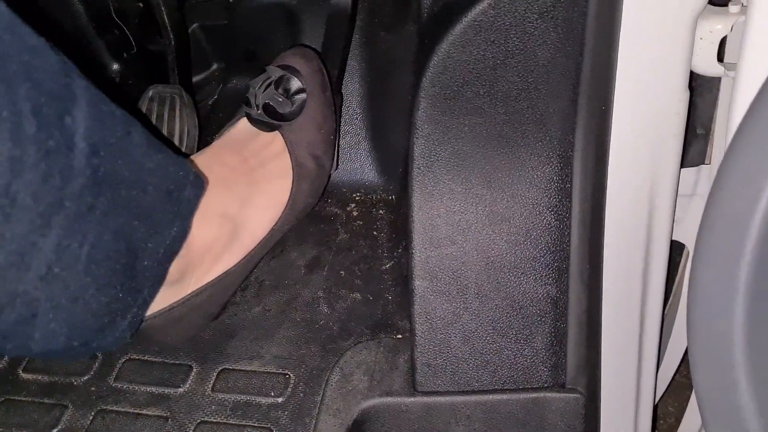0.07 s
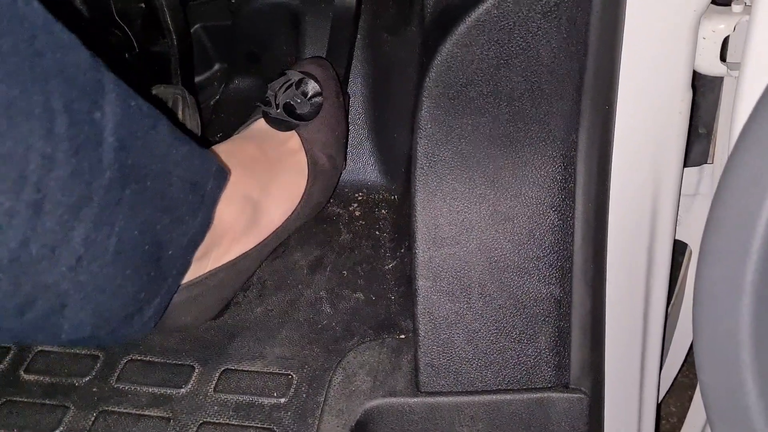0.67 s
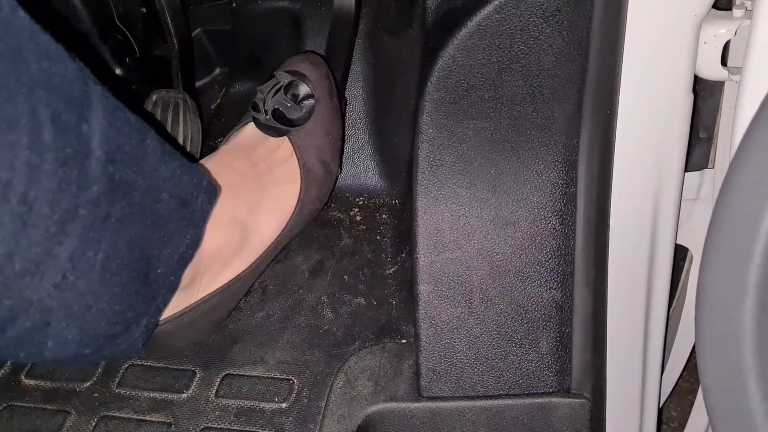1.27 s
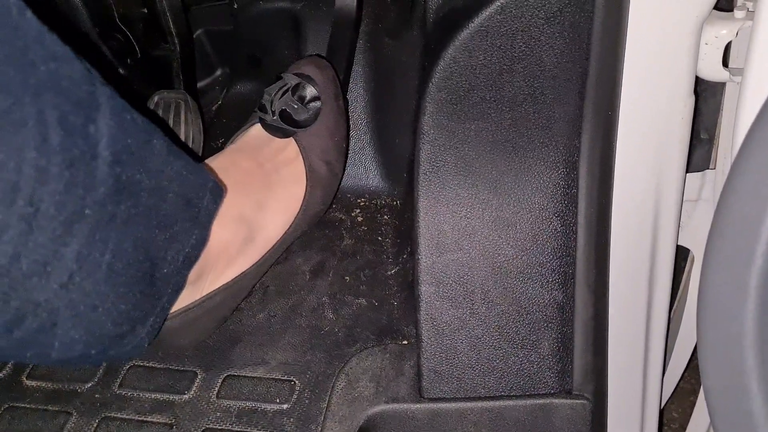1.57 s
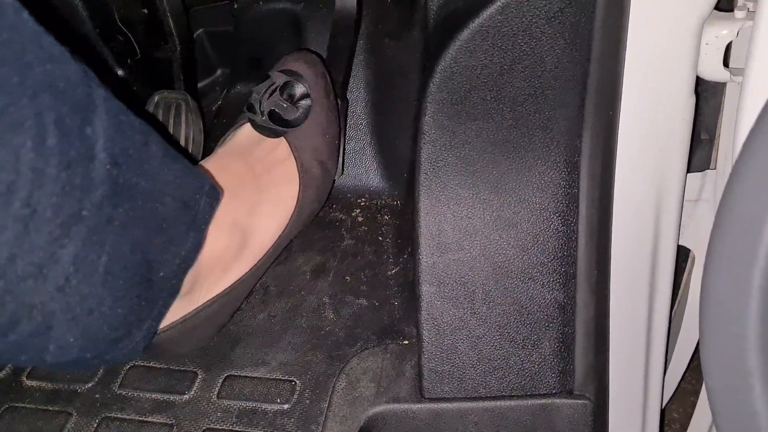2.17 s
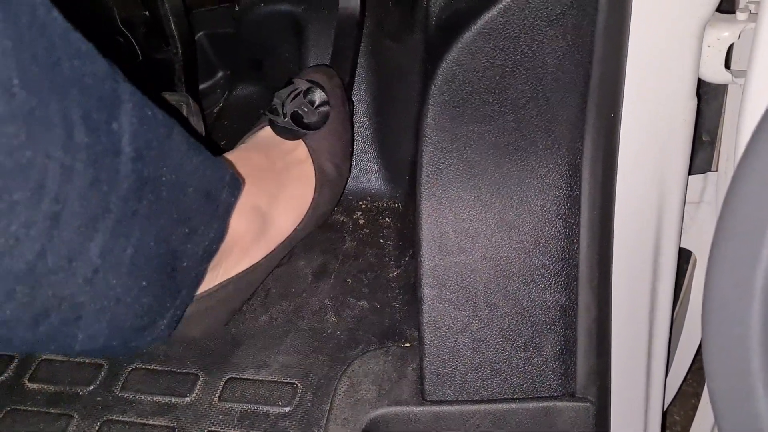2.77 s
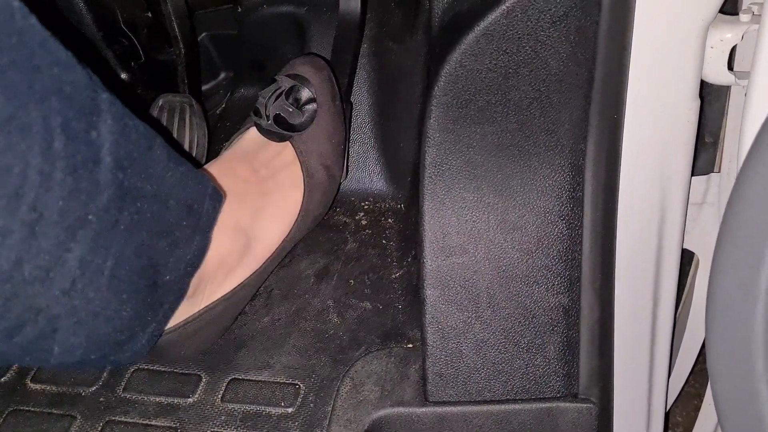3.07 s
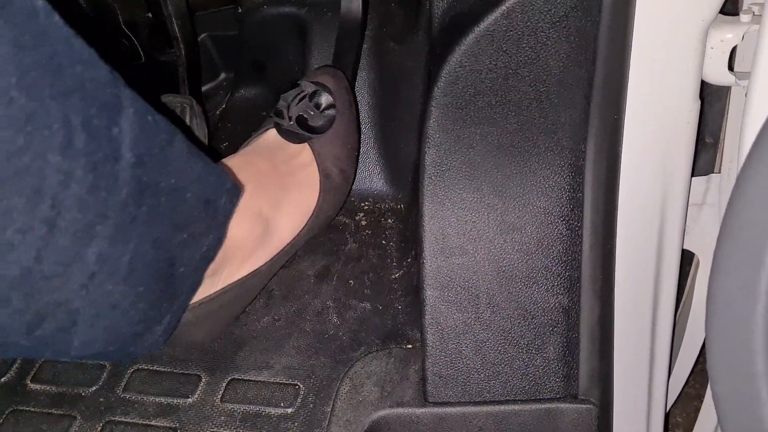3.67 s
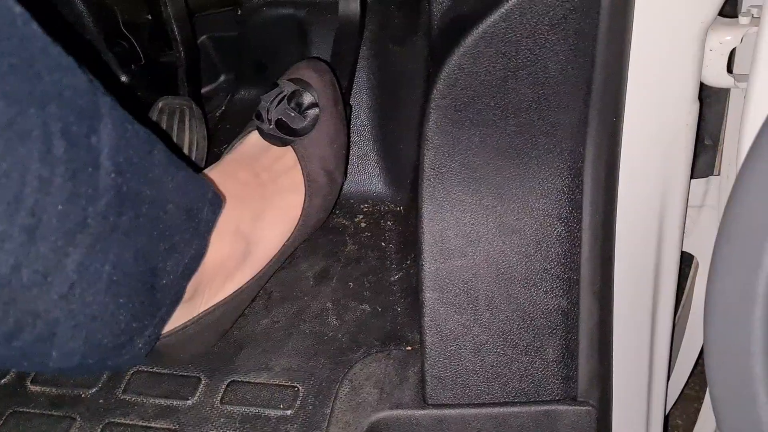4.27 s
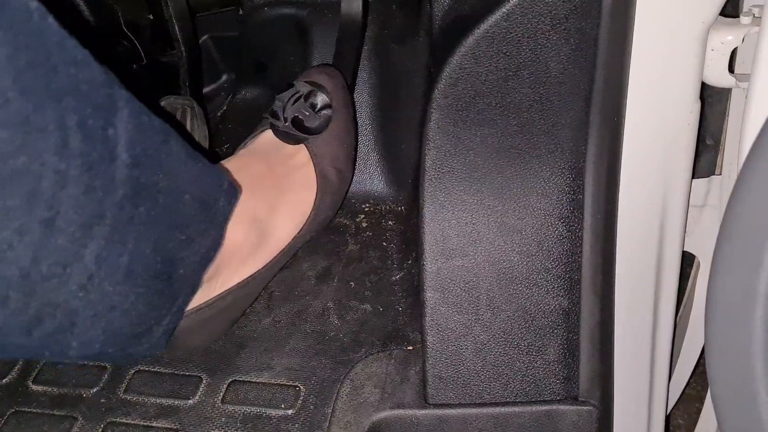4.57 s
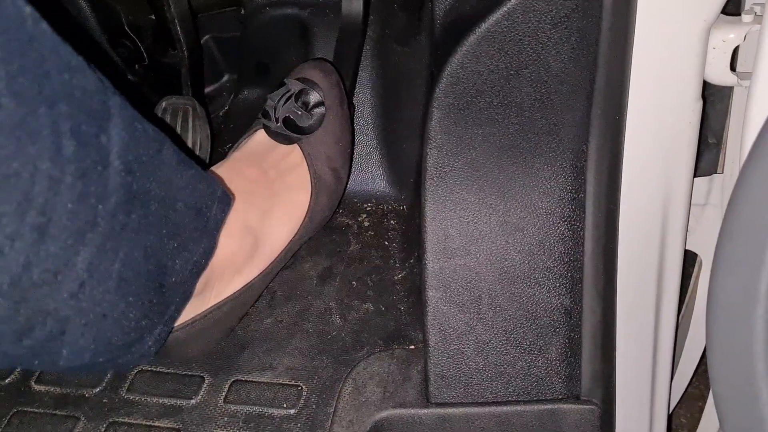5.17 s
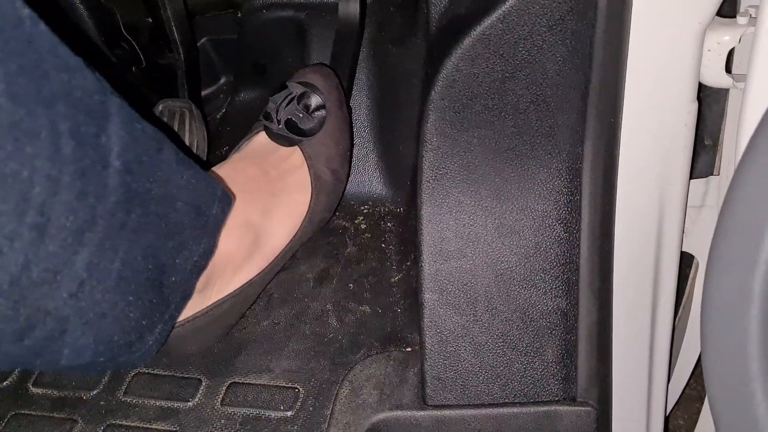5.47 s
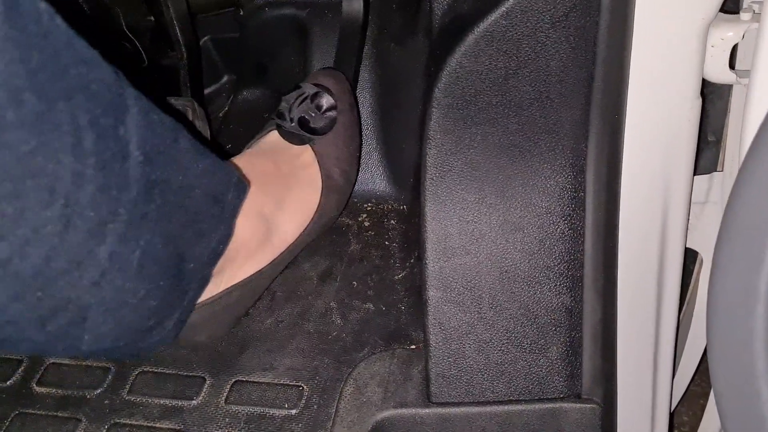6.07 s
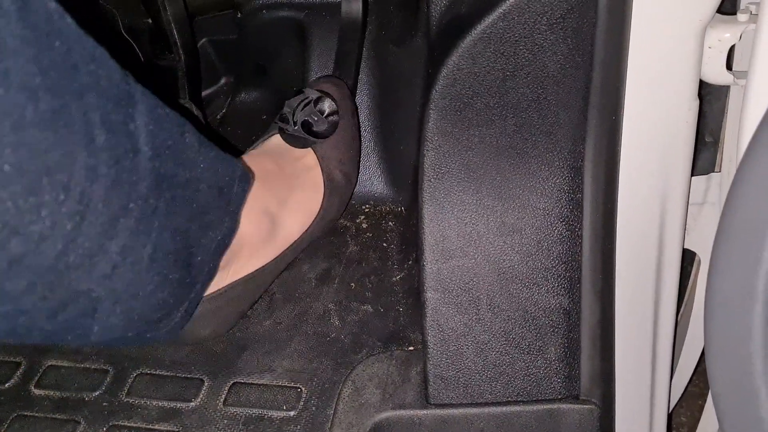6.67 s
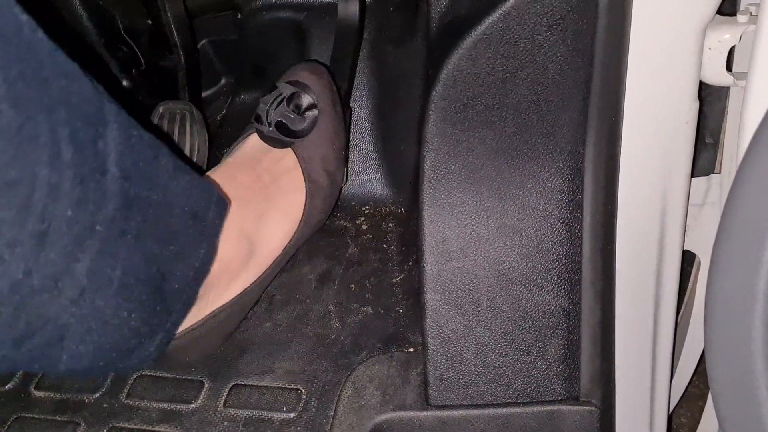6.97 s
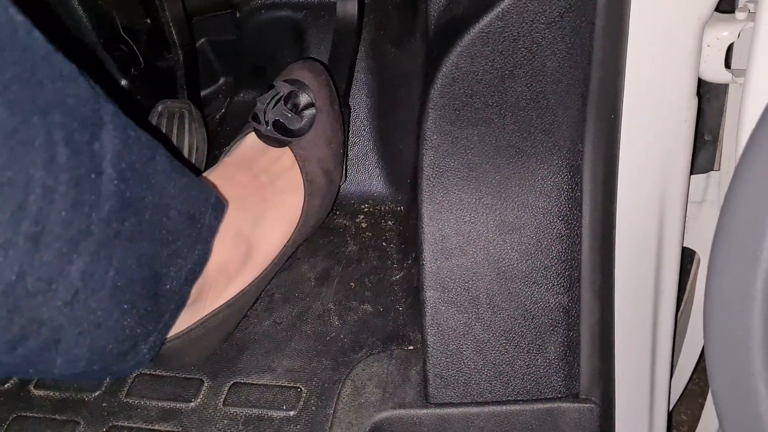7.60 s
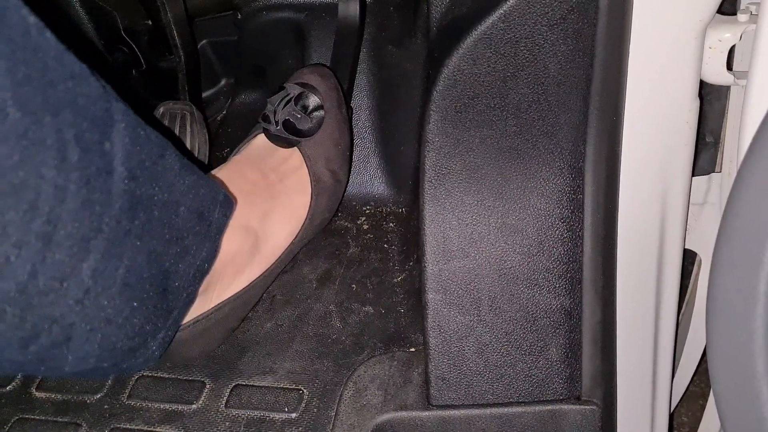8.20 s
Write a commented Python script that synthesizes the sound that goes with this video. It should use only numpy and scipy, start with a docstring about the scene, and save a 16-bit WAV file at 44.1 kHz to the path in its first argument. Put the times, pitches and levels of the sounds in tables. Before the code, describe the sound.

A car engine revs, heard from the driver's footwell: six short blips, then two higher ones, with deep boom, clatter and hiss.

```python
"""A car engine revs, heard from the driver's footwell: six short blips, then two more that climb higher.
Its four cylinders fire in turn, and the number of firings each second sets the pitch of a deep boom
in the cabin. The engine's knocks ring the panels between engine and cabin, which makes the clatter.
Each press of the pedal opens the throttle (the air valve): air gulps in and a pulsing hiss brightens.
Behind it all are a low rumble, a soft drone and thin whistles."""
import sys
import numpy as np
from scipy import signal
from scipy.fft import rfft, irfft, next_fast_len
from scipy.io import wavfile
from scipy.ndimage import uniform_filter1d

SR = 44100
rng = np.random.default_rng(int(sys.argv[2]) if len(sys.argv) > 2 else 0)


def dump(signal):
    """Clip the signal to [-1, 1] and save it as 16-bit WAV at the path in sys.argv[1]."""
    limited = np.clip(np.atleast_2d(signal).T, -1, 1)
    pcm = np.round(limited * 32767).astype(np.int16)
    wavfile.write(sys.argv[1], SR, pcm)


N = 372204
TIME, HZ = np.arange(N) / SR, np.fft.rfftfreq(next_fast_len(N, True), 1 / SR)
CRUISE_HZ = 60  # firing rate at which the levels of rumble, fizz and air are given
OPEN_S, CLOSE_S, CLOSE_LAG_S = 0.039, 0.051, 0.037  # throttle: opening, shutting, delay after a peak

# Pedal presses: pedal down t/s, engine peak t/s, top firing rate f/Hz, extra boom/dB, rushing air/dB,
# gulp strength/dB, lean towards the upper whistle/dB
PEDAL_PRESSES = [(0.689, 0.929, 72.25, 0.5, -43.5, -47, -2), (1.75, 1.932, 69.4, 1, -43, -30.5, 4),
                 (2.721, 2.91, 71.2, 0.5, -43.5, -50, 0), (3.715, 3.934, 67.5, -2, -42.5, -40, 4),
                 (4.66, 4.93, 70.86, -1.5, -42.5, -44, -4), (5.656, 5.877, 67.64, -2, -43.5, -46, -3),
                 (6.119, 6.306, 79.63, -2, -42.5, -54, -4), (6.55, 6.818, 97.12, -1.5, -42.5, -55, 2)]
DOWN_S, PEAK_S, TOP_HZ, BOOM_DB, AIR_DB, GULP_DB, LEAN_DB = np.transpose(PEDAL_PRESSES)
# Tone of the hiss: f/Hz, throttle shut left/dB, shut right/dB, open left/dB, open right/dB
HISS_TONE = [(1700, -6.5, -0.5, -6, 3), (2010, -8, -2, -10, -1.5), (2370, -15.5, -13, -4, -2),
             (2440, -12.5, -9, -5, -4.5), (2880, -14, -10, -11, -6.5), (3920, -19.5, -8.5, -12.5, 0.5),
             (4470, -21.5, -11, -16, -8), (5700, -20.5, -12.5, -19, -9.5), (6250, -19.5, -4.5, -11, -1.5),
             (6910, -17, -8, -19, -2.5), (7620, -36, -18.5, -22, -18), (8150, -21, -23.5, -18, -19),
             (8600, -18, -16, -14.5, -17), (9700, -29.5, -21.5, -26, -16.5),
             (11300, -28.5, -16.5, -29, -16.5), (15600, -35, -25, -34, -25)]
# Pitches of the gear and belt whines, as multiples of the firing rate
WHINE_MULTIPLES = [4, 6.5, 7, 8, 9, 10, 11, 12, 13, 15, 16, 18, 19, 20, 21, 22]


def amp(db):
    """Turns decibels into a gain."""
    return 10 ** (np.asarray(db) / 20)


def unit(x):
    """Scales the average level (rms) to 1; stereo goes by the mean of both sides."""
    return x / np.sqrt(np.mean(np.atleast_2d(x).mean(0) ** 2) + 1e-20)


def steadied(x, size=11000):
    """Holds the mean of both sides near level 1 over each quarter second."""
    return x / np.sqrt(uniform_filter1d(x.mean(0) ** 2, size) + 1e-20)


def at(rows, where):
    """Reads a table's columns along a moving frequency or time."""
    knots, *columns = np.transpose(rows)
    return np.array([np.interp(where, knots, c) for c in columns])


def spectra(rows):
    """Reads a table's columns at every frequency in HZ."""
    hz, *columns = np.transpose(rows)
    return np.array([np.interp(np.log(HZ + 1), np.log(hz + 1), c) for c in columns])


def colour(x, gain):
    """Filters x with one gain for each frequency."""
    size = next_fast_len(N, True)
    return irfft(rfft(x, size) * gain, size)[..., :N]


def bell(x, centre, width):
    """A smooth hump, 1 at its centre."""
    return np.exp(-((x - centre) / width) ** 2)


def drift(rate_hz):
    """A smooth random wander of level 1."""
    return unit(colour(rng.standard_normal(N), bell(HZ, 0, rate_hz)))


def strokes(firings, depth, sharpness):
    """A gain that swells once with every firing."""
    return unit(1 + depth * (.5 + .5 * np.cos(2 * np.pi * firings)) ** sharpness)


def pedal(close_s, lag_s=0):
    """How far each press opens the throttle, 0-1: it snaps open and eases shut as the engine peaks."""
    ramps = [np.minimum((TIME - down) / OPEN_S, (peak + lag_s - TIME) / close_s)
             for down, peak in zip(DOWN_S, PEAK_S)]
    return np.clip(np.array(ramps) + .5, 0, 1)


def throttle():
    """How open the throttle is over all presses, 0-1."""
    return pedal(CLOSE_S, CLOSE_LAG_S).sum(0)


def coasting(from_hz, age, friction_hz_per_s=12.8, drag_per_s=.273):
    """Friction and drag slow the engine once the pedal is up."""
    friction_hz = friction_hz_per_s / drag_per_s
    return (from_hz + friction_hz) * np.exp(-drag_per_s * age) - friction_hz


def firing_rate(start_hz=64.7, bend=1.17):
    """Firings per second, two for each engine turn: every press pulls the rate up, then it sinks."""
    rate = coasting(start_hz, TIME)
    for down, peak, top_hz in zip(DOWN_S, PEAK_S, TOP_HZ):
        from_hz = np.interp(down, TIME, rate)
        progress = np.clip((TIME - down) / (peak - down), 0, 1)
        climb = from_hz + (top_hz - from_hz) * progress ** bend
        rate = np.where(TIME < down, rate, np.where(TIME < peak, climb, coasting(top_hz, TIME - peak)))
    return rate


def rumble(rate, level_db=-38, db_per_octave=-3, apart=0.22):
    """The car's body shakes unevenly, most at low engine speed and almost alike at both ears."""
    # Tone of the shaking body: f/Hz, relative level/dB
    body_tone = [(10, -18), (24, -22), (36, 2.5), (60, 3), (85, -8), (110, -1), (135, -11), (220, -6),
                 (270, -21), (400, -12), (800, -64)]
    noise = rng.standard_normal(N) + apart * rng.standard_normal((2, N))
    shake = unit(colour(noise, amp(spectra(body_tone))))
    return amp(level_db + db_per_octave * np.log2(rate / CRUISE_HZ)) * shake * amp([[-.6], [.6]])


def drone(pitch_hz=110, waver=.25, flutter=.3):
    """A soft, wavering drone comes and goes in the cabin."""
    # Swells of the drone: t/s, level/dB
    swells = [(0, -58), (1.05, -41), (1.4, -35), (1.56, -50), (1.65, -29), (1.85, -30.5), (2.1, -52),
              (2.55, -39), (3.6, -52), (5.55, -44.5), (8.44, -50)]
    turns = pitch_hz * TIME + waver * drift(8)
    gain = amp(at(swells, TIME)[0]) * (1 + flutter * drift(10))
    return np.sqrt(2) * gain * np.cos(2 * np.pi * turns) * amp([[-.6], [.6]])


def whistles(shut_hz=6700, low_hz=4105, high_hz=7080, width_hz=36, shut_db=-57, low_db=-53, high_db=-56):
    """Air whistles thinly at the throttle: one tone when it is shut, two while it is open."""
    bands = (shut_hz, width_hz), (low_hz, 1.7 * width_hz), (high_hz, 2 * width_hz)
    shut, low, high = (unit(colour(rng.standard_normal((2, N)), bell(HZ, *band))) for band in bands)
    presses = pedal(CLOSE_S)
    rushing = (amp(low_db - LEAN_DB) @ presses) * low + (amp(high_db + LEAN_DB) @ presses) * high
    return (amp(shut_db) * shut * (1 - throttle()) + rushing) * amp([[-13], [0]])


def reflections():
    """Ringing metal and echoes off the footwell walls put close peaks and dips in the treble."""
    # Ringing engine parts: f/Hz, width/Hz, lift/dB
    metal_rings = [(2470, 40, 7.5), (2820, 35, 3), (3060, 40, 3.5), (3680, 33, 6), (5001, 64, 5)]
    knots_hz = np.arange(0, SR / 2, 40)
    ripples = rng.standard_normal((2, len(knots_hz)))
    ripple_db = 1.8 * np.array([np.interp(HZ, knots_hz, side) for side in ripples])
    ring_db = sum(db / (1 + (2 * (HZ - hz) / width) ** 2) for hz, width, db in metal_rings)
    return amp(ripple_db + ring_db)


def hiss(firings, rate, fizz_db=-46, leak_db=-60, low_cut_hz=1600, grain_db=0.4):
    """Valves fizz with each firing; air rushes through the open throttle and leaks past it at speed."""
    tone = amp(spectra(HISS_TONE)) / np.sqrt(1 + (low_cut_hz / (HZ + 1)) ** 20)
    fizz, air = rng.standard_normal((2, 2, N)) * amp(grain_db * drift(300))
    walls = reflections()
    valves = unit(colour(fizz * strokes(firings, depth=0.14, sharpness=5), walls * tone[:2]))
    rush = unit(colour(air * strokes(firings, depth=0.13, sharpness=2.5), walls * tone[2:]))
    octaves = np.log2(rate / CRUISE_HZ)  # all three parts grow louder as the engine speeds up
    flow = (amp(AIR_DB) @ pedal(CLOSE_S, CLOSE_LAG_S)) * amp(2 * octaves)
    leak = amp(leak_db + 32 * octaves)
    return amp(fizz_db + 14 * octaves) * valves + np.hypot(flow, leak) * rush


def gulps(body_db=11, body_hz=520, width_hz=90, top_hz=7000, rise_s=.002, decay_s=0.024, lead_s=0.0025):
    """Air bursts into the engine's empty intake pipes with a short, hollow chuff."""
    swell = np.zeros(N)
    for down, db in zip(DOWN_S, GULP_DB):
        age = np.maximum(TIME - down + lead_s, 0)
        swell += amp(db) * (1 - np.exp(-age / rise_s)) * np.exp(-age / decay_s)
    hollow = 1 + amp(body_db) * bell(HZ, body_hz, width_hz) + 1.8 * np.exp(-(HZ / 1900) ** 4)
    band = HZ ** 4 / (HZ ** 4 + 400 ** 4) / (1 + (HZ / top_hz) ** 4)
    open_tone = amp(spectra(HISS_TONE)[2:])
    return 2 * swell * unit(colour(rng.standard_normal((2, N)), open_tone * hollow * band))


def panel_ring(rate, ring_hz=782, width_hz=16, level_db=-36, centre_hz=68, reach_hz=4):
    """One panel sings out while the engine passes through the speeds that shake it most."""
    ring = unit(colour(rng.standard_normal(N), bell(HZ, ring_hz, width_hz)))
    return amp(level_db) * bell(rate, centre_hz, reach_hz) * ring * amp([[-4], [2]])


def whine(firings, waver=0.5, slip=0.059, throttle_dip=0.25):
    """Gears and belt sing along with the engine; slack between the parts blurs their tones."""
    # Strength of each whine next to the knocking: level/dB
    whine_levels = [-11, -18.5, -17, -13.5, -14.5, -13, -11.5, -10.5, -12.5, -15, -19, -14.5, -15, -18, -14,
                    -11.5]
    tones = np.zeros(N)
    for multiple, db in zip(WHINE_MULTIPLES, whine_levels):
        slack, flutter = drift(20), drift(14)
        turns = multiple * firings + rng.random() + slip * np.sqrt(multiple / 10) * slack
        tones += np.sqrt(2) * amp(db) * np.cos(2 * np.pi * turns) * (1 + waver * flutter)
    return tones * (1 - throttle_dip * throttle())  # they stand out most with the pedal up


def knock_cycle(firings, firing_db=5, turn_db=4, count=200, size=8192):
    """Knocks repeat every four firings; tones in step with each engine turn or firing are stronger."""
    multiple = np.arange(count) / 4
    db = firing_db * (multiple % 1 == 0) + turn_db * (multiple % .5 == 0)
    heard = (multiple > 3) & ~np.isin(multiple, WHINE_MULTIPLES)  # leaves room for boom and whines
    tones = amp(db) * np.exp(2j * np.pi * rng.random(count)) * heard
    place_in_cycle = firings / 4 % 1
    return unit(np.interp(place_in_cycle * size, np.arange(size), irfft(tones, size)))


def knocking(firings):
    """The knock pattern slowly changes, over a loose rattle that differs with each stroke."""
    blend = 0.63 * drift(0.71)
    first, second = knock_cycle(firings), knock_cycle(firings)
    loose = .66 * unit(colour(rng.standard_normal(N), HZ < 3000))
    impacts = strokes(4 * firings, depth=2.5, sharpness=2)
    knocks = np.cos(blend) * first + np.sin(blend) * second + loose * impacts
    return knocks * strokes(firings, depth=0.31, sharpness=0.67)


def clatter(firings, rate, lag_s=0.00011, steepness=1.57):
    """Knocks and whines ring the panels and reach the left side a moment after the right."""
    # Pitches at which panels and cabin ring: f/Hz, width/Hz, relative left/dB, relative right/dB
    panels = [(185, 85, -7, -5), (299, 23, -10.5, -10), (339.7, 14, -9.5, -4.5), (427, 42, -1.5, -1),
              (491.7, 31.5, 2.5, 3), (555, 36, -1, 1), (592, 68, 1.5, -26), (668, 52, -9.5, -11),
              (769.3, 45, -2, 3), (819, 63, 1.5, -4.5), (956, 84, -2, -6.5), (1006, 63, -10.5, 4),
              (1107, 55, 3, -1.5), (1201, 43, 1.5, 6), (1269, 64, 1.5, 5.5), (1372.5, 68, -0.5, 6.5),
              (1537, 130, -11.5, -7), (1880, 250, -44, -24)]
    # How alike the two sides are: f/Hz, likeness (0-1)
    likeness = [(200, 0.84), (340, 0.83), (500, 1), (780, 0.61), (1200, 0.61), (1500, 0.93), (1900, 0.21)]
    # Panel rattle at each engine speed: firing rate f/Hz, low band/dB, middle band/dB, high band/dB
    rattle = [(43.7, -39, -53, -41), (52.8, -42.5, -48.5, -39), (54.8, -41.5, -48, -35.5),
              (60.5, -38, -43, -37), (64.5, -38, -39.5, -33.5), (67.9, -35.5, -40.5, -32),
              (73, -36, -40.5, -33.5), (82.8, -31.5, -37, -32.5), (85, -33, -45, -31.5),
              (94.1, -29.5, -39, -31)]
    # Change in rattle with the throttle open: low band/dB, middle band/dB, high band/dB
    open_change = [2.5, -1, 0]
    direct, scattered = knocking(firings) + whine(firings), knocking(firings)
    same = np.clip(spectra(likeness)[0], -1, 1)
    delay = np.exp(-2j * np.pi * HZ * lag_s)
    left = colour(direct, same * delay) + colour(scattered, np.sqrt(1 - same ** 2))
    drive = np.array([left, direct])
    power = sum(amp([[left_db], [right_db]]) ** 2 / (1 + np.abs(2 * (HZ - hz) / width) ** (2 * steepness))
                for hz, width, left_db, right_db in panels)
    low, high = 1 / (1 + (HZ / 700) ** 30), 1 - 1 / (1 + (HZ / 900) ** 30)
    bands = low, np.maximum(1 - low - high, 0), high
    levels = at(rattle, rate) + np.outer(open_change, throttle())
    return sum(amp(db) * steadied(colour(drive, np.sqrt(power * band))) for db, band in zip(levels, bands))


def boom(firings, rate, lag_s=0.0003, unload_s=0.065, settle_s=0.0068):
    """The firings' three lowest tones swell as they slide through pitches at which the cabin rings."""
    # Cabin's answer at 1, 2 and 3 times the firing rate: f/Hz, pedal up level/dB, pedal down level/dB
    first = [(47, -36.5, -24), (46.3, -23, -38.5), (49.9, -31.5, -27.5), (53.7, -21.5, -18.5),
             (57, -24, -16), (61.1, -21.5, -20.5), (63.6, -28, -21.5), (65.4, -29.5, -23.5),
             (72, -26.5, -22.5), (77, -24.5, -20.5), (82.8, -26, -20), (87.4, -18.5, -15), (95, -27, -18.5),
             (95.5, -23, -19)]
    second = [(93, -41, -54), (100, -31, -25.5), (100.6, -37, -37.5), (115, -41, -35.5), (120, -58, -52),
              (128.3, -41, -39), (162, -38.5, -36), (173.6, -53, -37), (177, -35, -32.5)]
    third = [(146, -44, -43), (143, -45, -41), (158, -69, -70), (165.6, -43.5, -38), (176.3, -33, -45),
             (168.5, -64, -26), (201, -35.5, -72), (205.6, -61, -74), (215, -35, -46), (225.9, -34.5, -34),
             (243, -38, -36), (246, -49, -43), (283, -42, -52)]
    presses = pedal(unload_s)
    load, extra_db = presses.sum(0), BOOM_DB @ presses
    hum = np.zeros(N)
    voices = (first, np.cos, 0.032), (second, np.sin, 0.13), (third, np.cos, 0.13)
    for multiple, (response, wave, tremble) in enumerate(voices, 1):
        up_db, down_db = at(response, multiple * rate)
        gain = uniform_filter1d(amp(up_db + load * (down_db - up_db) + extra_db), int(settle_s * SR))
        uneven = 1 + tremble * drift(28)  # no two firings are equal
        hum += gain * wave(2 * np.pi * multiple * firings) * uneven
    left = np.interp(TIME - lag_s, TIME, hum)  # the wave in the cabin reaches the left side later
    return np.sqrt(2) * np.array([left, hum]) * amp([[-.7], [.7]])


def scene(wobble=0.0015):
    """One slightly unsteady engine shaft keeps the engine's layers in step."""
    rate = firing_rate()
    firings = np.cumsum(rate * (1 + wobble * drift(12.4))) / SR  # running count of firings
    background = rumble(rate) + drone()
    air = whistles() + hiss(firings, rate) + gulps()
    return background + air + panel_ring(rate) + clatter(firings, rate) + boom(firings, rate)


def record(dry):
    """Cuts the very highest treble, above 15730 Hz."""
    return signal.oaconvolve(dry, signal.firwin(801, 15730, window=("kaiser", 9), fs=SR)[None], "same")


dry = scene()
out = record(dry)
dump(out)
```